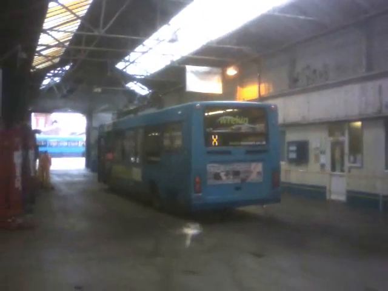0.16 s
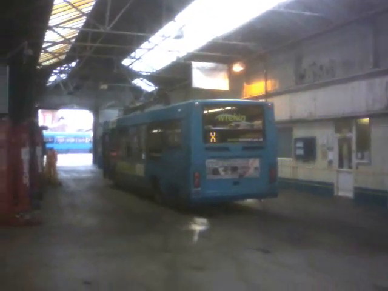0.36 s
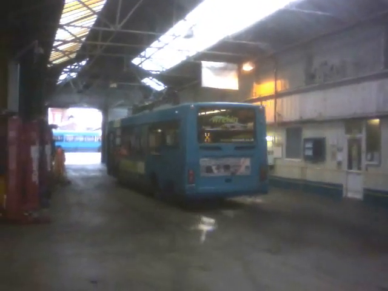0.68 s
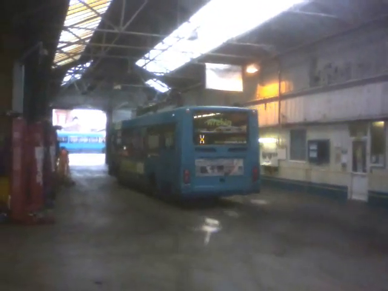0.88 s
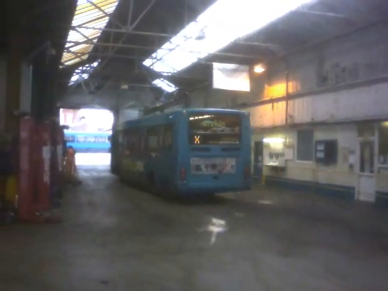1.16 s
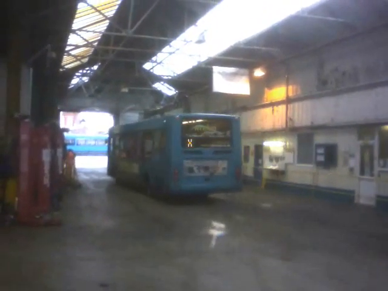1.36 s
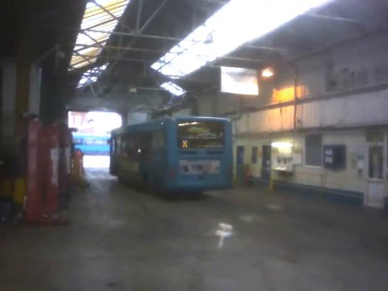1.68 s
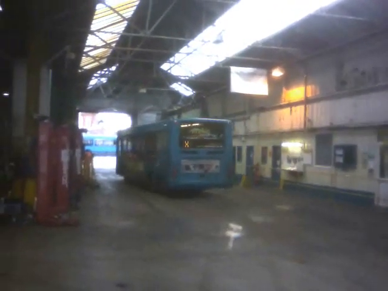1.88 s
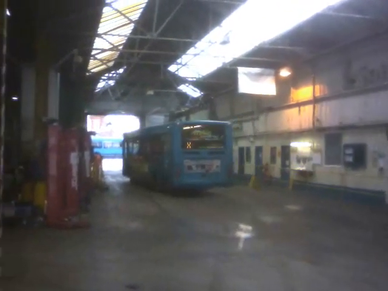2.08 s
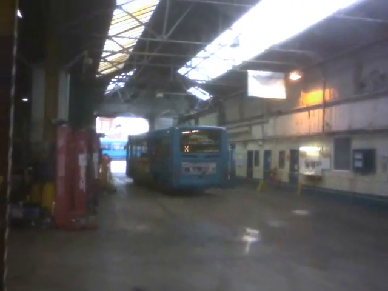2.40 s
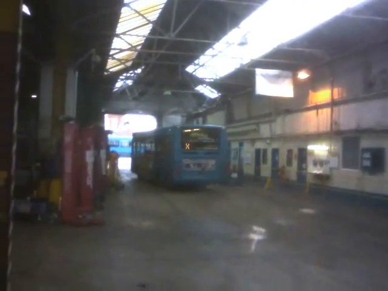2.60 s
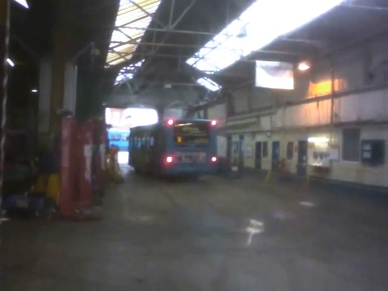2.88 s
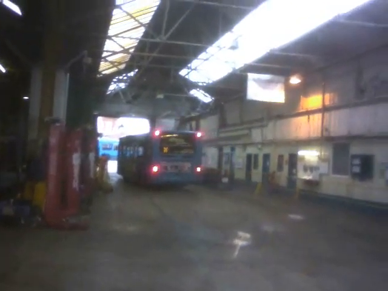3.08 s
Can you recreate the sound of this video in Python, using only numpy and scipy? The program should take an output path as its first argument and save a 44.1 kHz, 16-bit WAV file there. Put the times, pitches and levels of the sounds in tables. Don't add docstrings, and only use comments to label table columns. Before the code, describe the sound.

A diesel bus engine roars and clatters as it pulls away, revs slightly higher with fan and gear whine, then drops and fades in a hard echoing depot, captured by a harsh low-quality phone microphone.

```python
import sys
import numpy as np
from scipy import signal
from scipy.fft import rfft, irfft, next_fast_len
from scipy.io import wavfile
from scipy.ndimage import uniform_filter1d, map_coordinates

SR = 44100
rng = np.random.default_rng(int(sys.argv[2]) if len(sys.argv) > 2 else 0)


def waveform_to_disk(signal):
    frames = np.transpose(np.atleast_2d(signal))
    scaled = np.clip(frames, -1, 1) * 32767
    samples = np.round(scaled).astype(np.int16)
    wavfile.write(sys.argv[1], SR, samples)


def invert_db(level):
    return 10 ** (np.asarray(level, dtype=float) / 20)


N = 143325

# f/Hz, time to fall 60 dB/s
HALL_DECAY = [(100, 1.93), (1000, 1.01), (4000, 3.3)]
# multiple of its firing rate, level/dB
IDLE_TONES = [(1, -43), (2, -56), (3, -58.5), (4, -42.5), (6, -45.5)]
# f/Hz, level per Hz/dB
IDLE_BLOCK = [(70, -20.5), (450, -7), (600, -1), (960, 1), (1330, -7.5), (1800, -4.5), (2400, -17),
              (3900, -25.5)]
# t/s, f/Hz, level/dB
SECOND_GEAR_WHINE = [
    (.6, 810, -45),
    (.8, 840, -25),
    (1.05, 900, -27),
    (1.25, 950, -24),
    (1.6, 955, -28),
    (2.1, 950, -33),
    (2.4, 945, -26),
    (2.65, 940, -29),
    (2.9, 935, -45),
]
# t/s, f/Hz, level/dB
GEAR_WHINE = [
    (1.45, 1610, -70),
    (1.58, 1640, -31),
    (1.9, 1710, -28),
    (2.05, 1720, -26),
    (2.2, 1765, -70),
]
# t/s, firing rate/Hz
FIRING_RATE = [
    (0, 65),
    (1.3, 76.4),
    (1.6, 79.3),
    (2.1, 80.5),
    (2.5, 78),
    (3.25, 66),
]
# t/s, level/dB
EFFORT = [(0, -15.5), (.4, -14), (.48, -15), (.8, -14.5), (1.82, -12.5), (2.05, -16), (2.28, -16),
          (2.4, -16), (2.56, -19.5), (2.72, -21), (2.9, -24.5), (3.25, -26)]
# f/Hz, level per Hz/dB
BLOCK = [(45, -20), (90, -16), (250, -6), (900, -4), (1950, -7), (2250, -14), (3400, -18), (4000, -25)]
# f/Hz, width/Hz, boost/dB
CASING_RINGS = [(978, 380, 6.5), (1751, 680, 4), (328, 68, 2.5)]
# multiple of the firing rate, level/dB
FAN_BLADE_TONES = [(11, -36.5), (13, -37), (14, -34.5)]
# sixths of the firing rate, level/dB
EXHAUST_TONES = [(18, -48), (21, -37), (23, -39.5), (24, -32.5), (25, -45), (26, -38), (27, -36), (30, -33),
                 (36, -32.5), (42, -32.5), (48, -31)]
# f/Hz, width/Hz, boost/dB
PIPE = [(68.6, 13, 8.5), (80.3, 10, -13), (150.6, 7.2, 3), (281.7, 4.3, 5), (311.5, 49, 5.5),
        (413.6, 17, 5.5)]
# t/s, level/dB
BOOM = [
    (0, -27.5),
    (.13, -28.5),
    (.95, -29),
    (1.05, -25.5),
    (1.35, -20.5),
    (1.55, -37),
    (1.9, -28),
    (2.3, -28),
    (3.2, -46),
]
# sixths of the firing rate, level/dB
BOOM_TONES = [(6, -13), (8, -16.5), (9, -11.5), (12, -10), (13, -9), (15, -18)]
# f/Hz, rounding step as a multiple of the broad level
COARSE_STEPS = [(2500, .05), (4000, .85), (8000, .95), (10500, .9), (12000, 1.5), (14000, 1)]


def unit(x):
    return x / np.sqrt(np.mean(x ** 2) + 1e-20)


def along(points, hz):
    f, v = np.transpose(points)
    return np.interp(np.log(hz + 1), np.log(f + 1), v)


def curves(rows):
    s, *cols = np.transpose(rows)
    return [np.interp(np.arange(N) / SR, s, c) for c in cols]


def wobble(rate):
    knots = rng.standard_normal(int(N * rate / SR) + 4)
    return map_coordinates(knots, [np.arange(N) * rate / SR])


def filtered(x, response):
    m = next_fast_len(N + SR // 2)
    return irfft(rfft(x, m) * response(np.fft.rfftfreq(m, 1 / SR)), m)[:N]


def bumps(peaks, hz):
    return invert_db(sum(db / (1 + (2 * (hz - c) / w) ** 2) for c, w, db in peaks))


def hall(x, wet_db):
    hop, lead = int(0.25 * SR), SR // 2
    long = np.r_[x[lead:0:-1], x, np.zeros(2 * hop)]
    wet = np.zeros(N + 3 * SR)
    fade = np.sin(np.arange(2 * hop) * np.pi / (2 * hop))
    for at in range(0, N + lead, hop):
        hz, t, z = signal.stft(rng.standard_normal(SR * 2 // 3), SR, nperseg=256)
        decay = invert_db(-60 * t / along(HALL_DECAY, hz)[:, None])
        tail = signal.istft(z * decay, SR, nperseg=256)[1]
        piece = signal.fftconvolve(long[at:at + 2 * hop] * fade, tail / np.linalg.norm(tail))
        wet[at:at + len(piece)] += piece
    return (x + invert_db(wet_db) * wet[lead:][:N]) / np.hypot(1, invert_db(wet_db))


def clatter(firings, repeats, colour, wet_db):
    pattern = rng.standard_normal(1024)
    same = pattern[(firings / 6 % 1 * len(pattern)).astype(int)]
    share = np.clip(repeats, 0, 1)
    strength = invert_db(3.3 * rng.standard_normal(1024))[firings.astype(int)]
    swell = 1 + 0.52 * strength * np.cos(2 * np.pi * firings)
    fresh = unit(filtered(swell * rng.standard_normal(N), colour))
    repeated = unit(filtered(same, colour))
    return unit(hall(np.sqrt(share) * repeated + np.sqrt(1 - share) * fresh, wet_db))


def tones(turns, table, wander_db):
    total = 0
    for k, db in table:
        level = np.sqrt(2) * invert_db(db + wander_db * wobble(4.77))
        total = total + level * np.sin(2 * np.pi * (k * turns + rng.random()))
    return total


def whine(rows, blur_hz):
    hz, db = curves(rows)
    turns = np.cumsum(hz + blur_hz * wobble(25)) / SR
    return np.sqrt(2) * invert_db(db + 2.1 * wobble(14)) * np.sin(2 * np.pi * turns)


def idling_bus():
    firings = np.cumsum(35.3 + 0.308 * wobble(2)) / SR
    far = clatter(firings, 0.14, lambda hz: invert_db(along(IDLE_BLOCK, hz)), wet_db=19)
    return tones(firings, IDLE_TONES, wander_db=2.5) + invert_db(-24) * far


def engine_roar(firings, effort_db):
    def colour(hz):
        return invert_db(along(BLOCK, hz)) * bumps(CASING_RINGS, hz)

    roar = clatter(firings, 0.25, colour, wet_db=5.5)
    return invert_db(effort_db + 0.5 * wobble(12)) * roar


def exhaust_hum(firings, effort_db):
    def pipe(hz):
        return bumps(PIPE, hz)

    hum = filtered(tones(firings / 6, EXHAUST_TONES, wander_db=1.2), pipe)
    hum = hum + tones(firings, FAN_BLADE_TONES, wander_db=5)
    hum = invert_db(1.6 * (effort_db - effort_db.max())) * hall(hum, wet_db=-10)
    boom = filtered(tones(firings / 6, BOOM_TONES, wander_db=1.5), pipe)
    return hum + invert_db(curves(BOOM)[0]) * boom


def departing_bus():
    firings = np.cumsum(curves(FIRING_RATE)[0]) / SR
    effort_db = curves(EFFORT)[0]
    engine = engine_roar(firings, effort_db) + exhaust_hum(firings, effort_db)
    return engine + whine(GEAR_WHINE, blur_hz=7.7) + whine(SECOND_GEAR_WHINE, blur_hz=14)


def scene():
    return (idling_bus() + departing_bus())[None]


def coarse(x):
    z = signal.stft(x, window="cosine", nperseg=2048)[2]
    power = uniform_filter1d(abs(z) ** 2, int(1800 * 2048 / SR), axis=0)
    level = np.sqrt(uniform_filter1d(power, 3, axis=1) + 1e-20)
    step = along(COARSE_STEPS, np.fft.rfftfreq(2048, 1 / SR))[:, None] * level
    step = step * invert_db(1.2 * rng.standard_normal(z.shape[1]))
    return signal.istft(step * np.round(z / step), window="cosine", nperseg=2048)[1][:N]


def top_cut(x):
    return signal.sosfilt(signal.butter(12, 16510, fs=SR, output="sos"), x)


def record(dry):
    hold_hz, band_hz, steepness, top_hz = 8002.6, 3800, 10.3, 15450
    band = filtered(dry[0], lambda hz: 1 / (1 + (hz / band_hz) ** (2 * steepness)))
    sample_number = np.floor(np.arange(N) * hold_hz / SR)
    held = band[(sample_number * SR / hold_hz).astype(int)] - 0.0047
    held = coarse(np.clip(held, -0.9, 0.9))
    mix = filtered(held, lambda hz: hz < top_hz)[None]
    return top_cut(mix)


dry = scene()
out = record(dry)
waveform_to_disk(out)
```